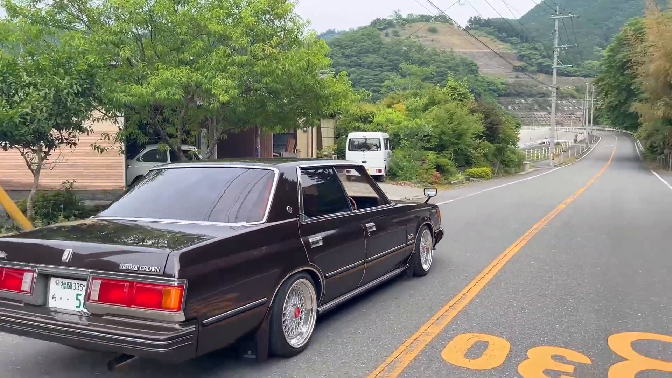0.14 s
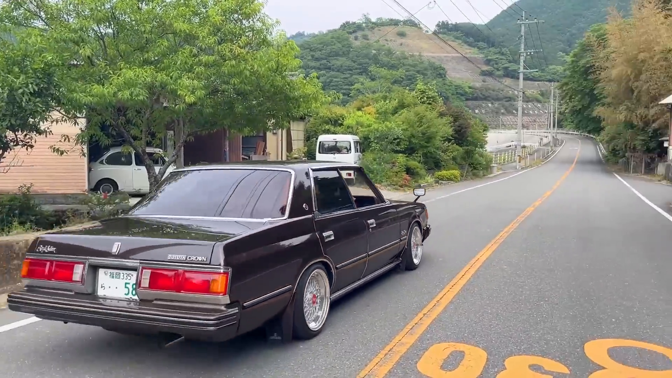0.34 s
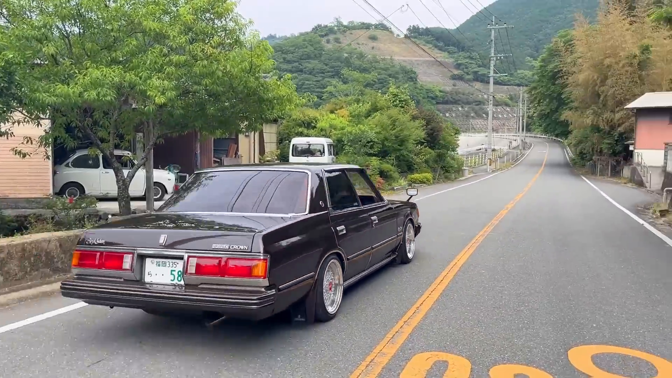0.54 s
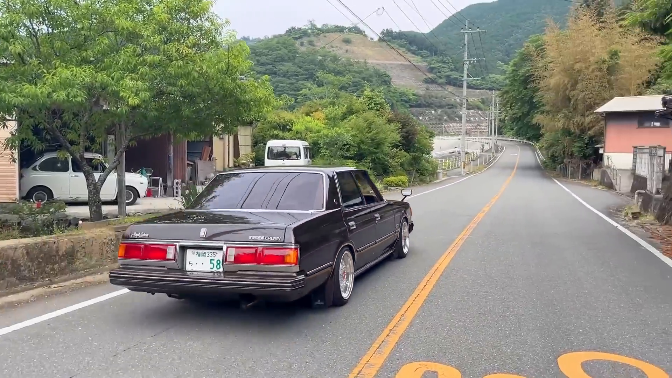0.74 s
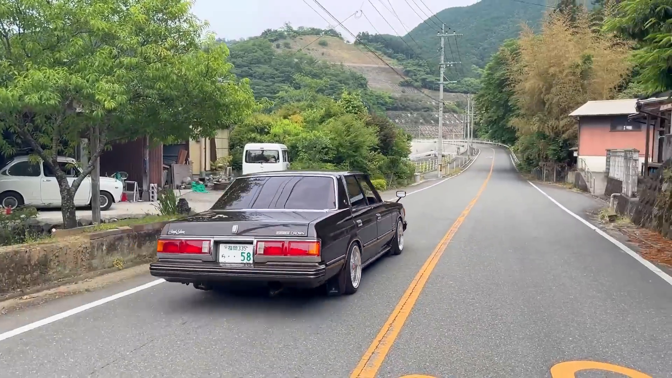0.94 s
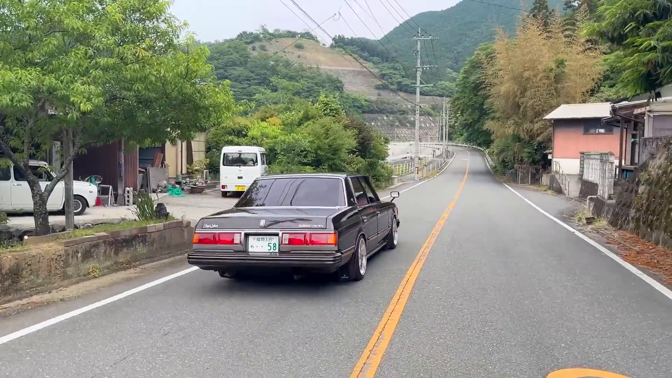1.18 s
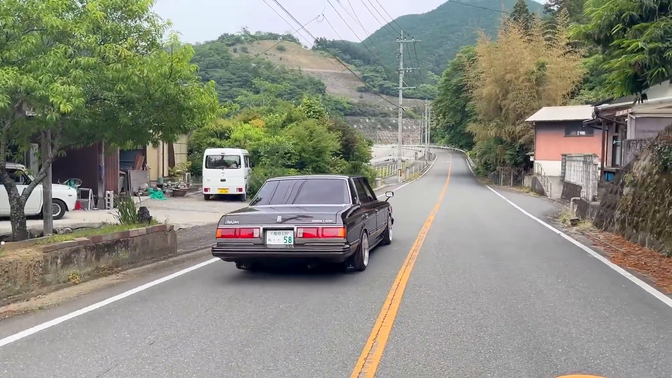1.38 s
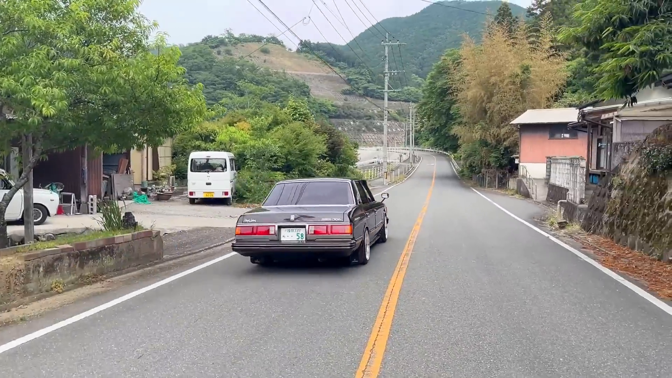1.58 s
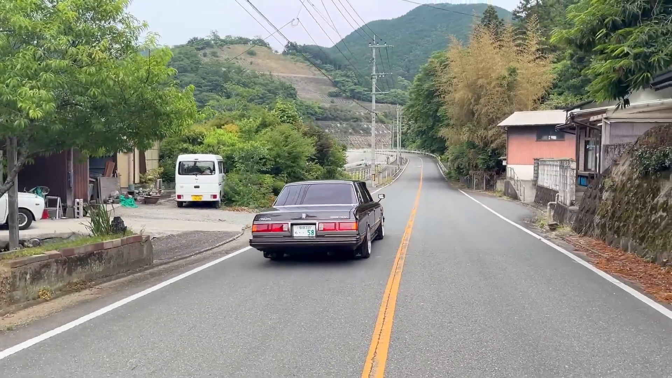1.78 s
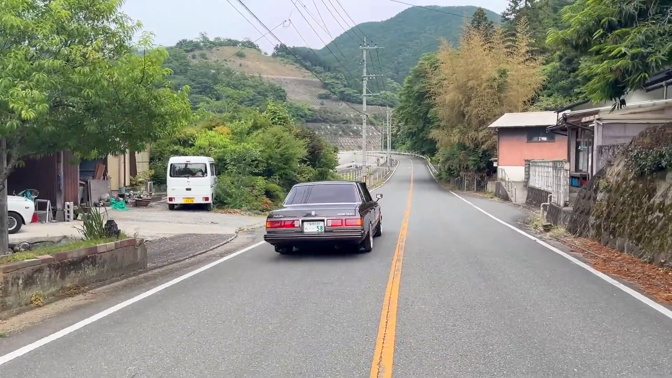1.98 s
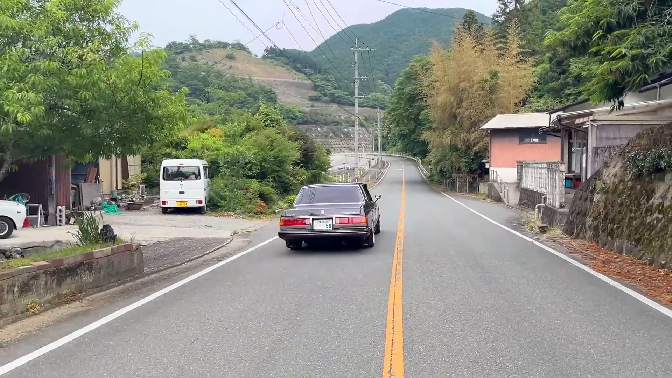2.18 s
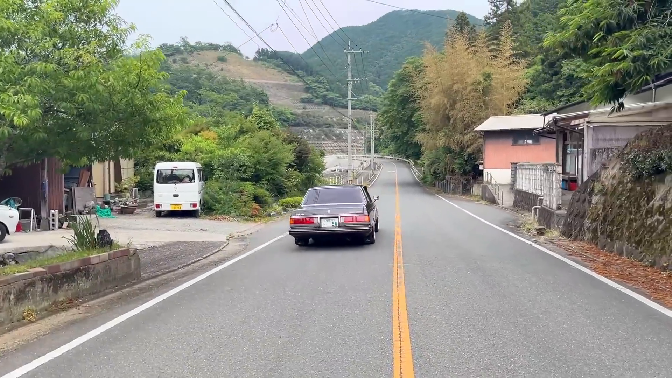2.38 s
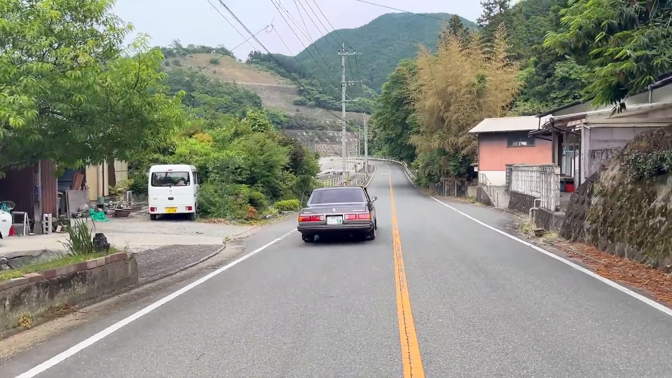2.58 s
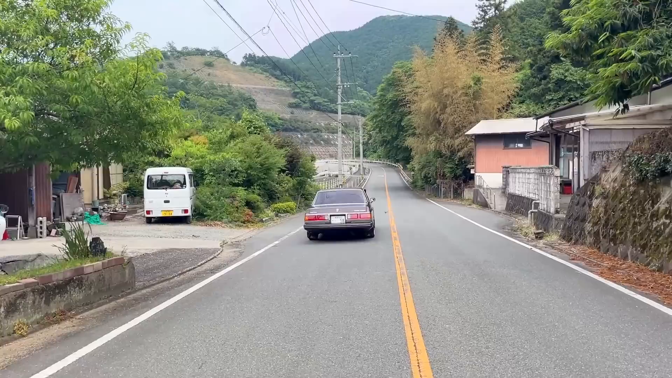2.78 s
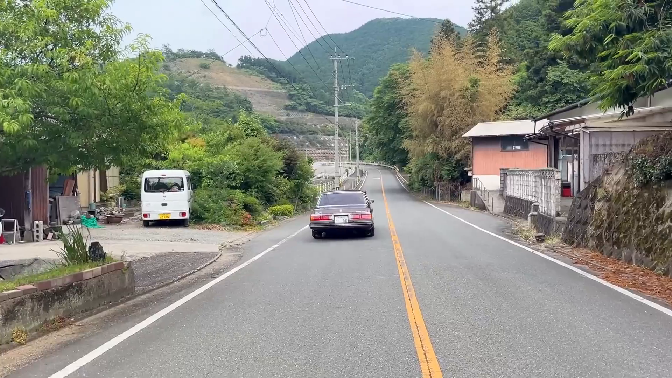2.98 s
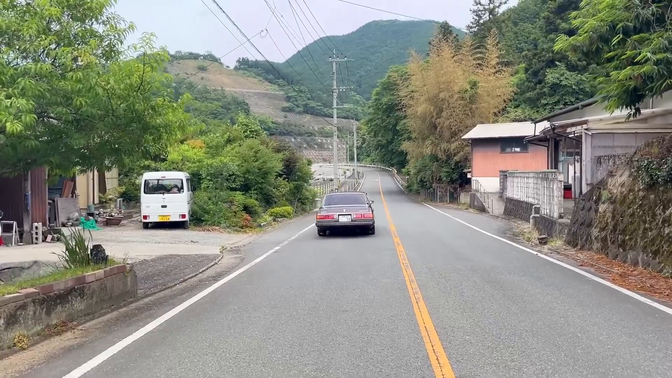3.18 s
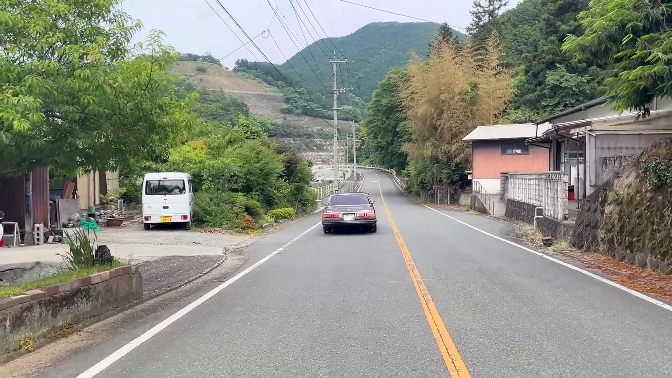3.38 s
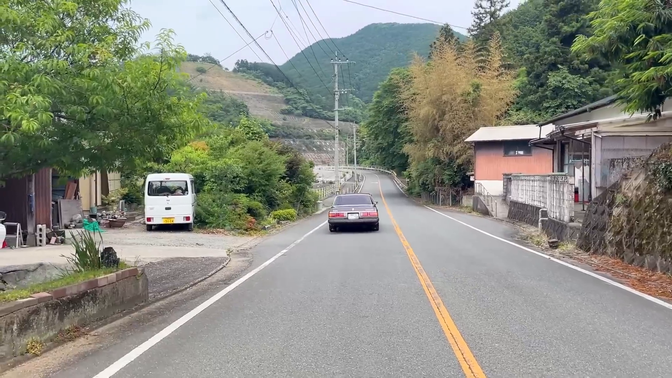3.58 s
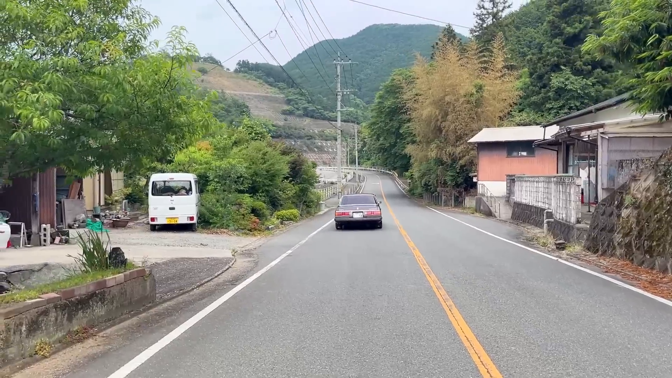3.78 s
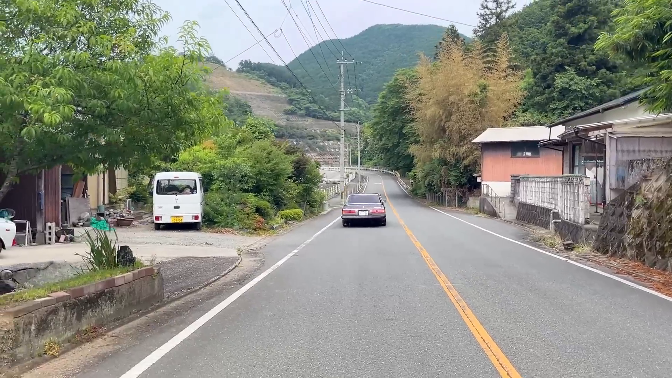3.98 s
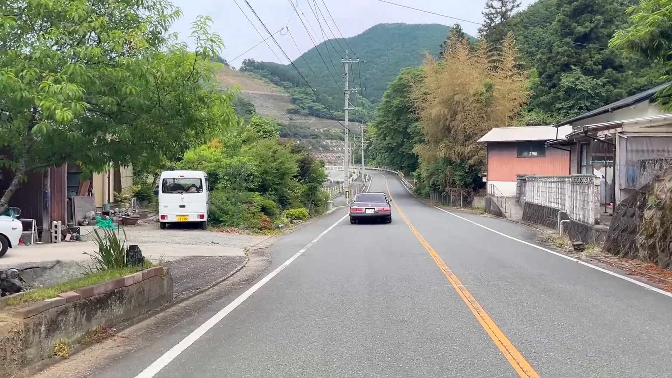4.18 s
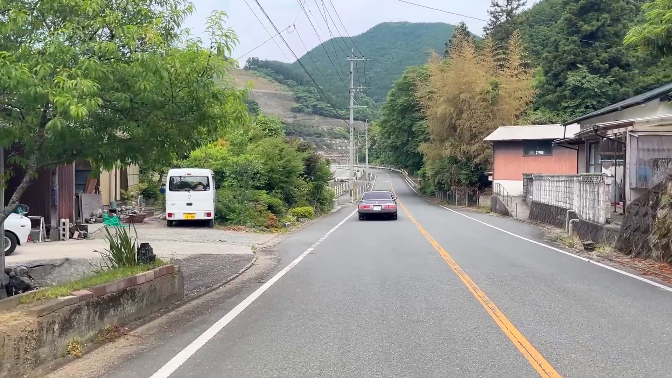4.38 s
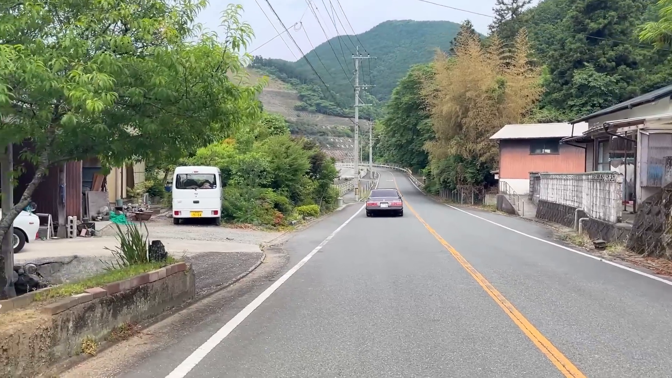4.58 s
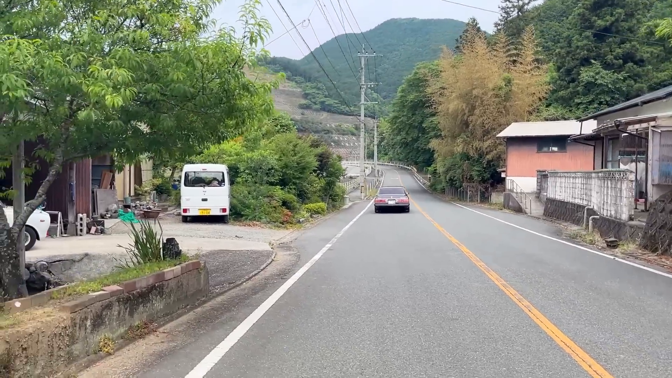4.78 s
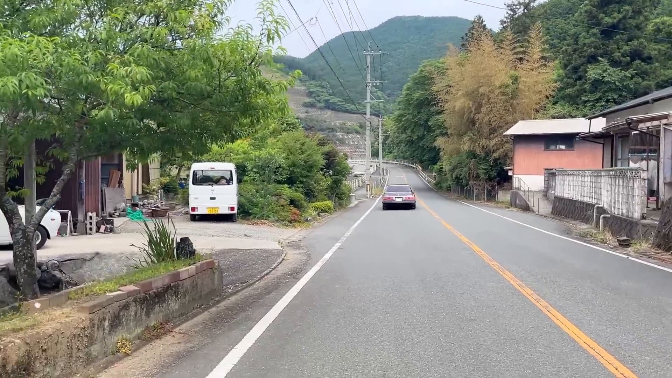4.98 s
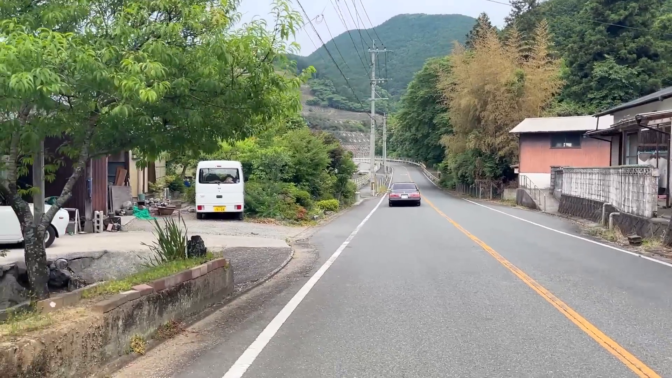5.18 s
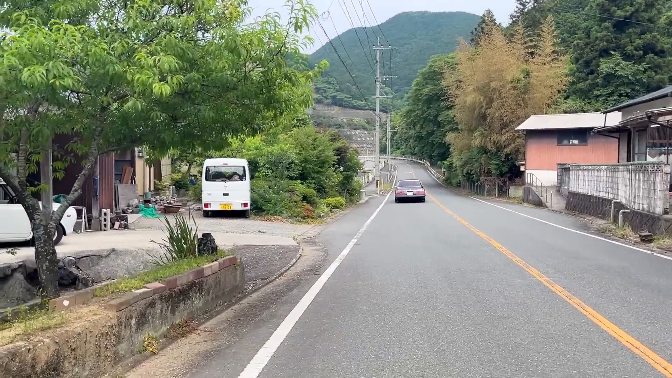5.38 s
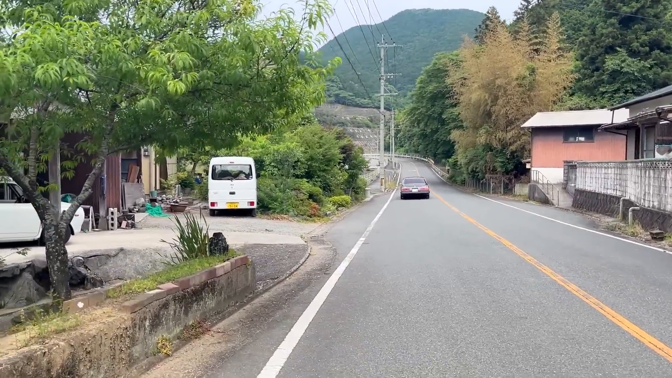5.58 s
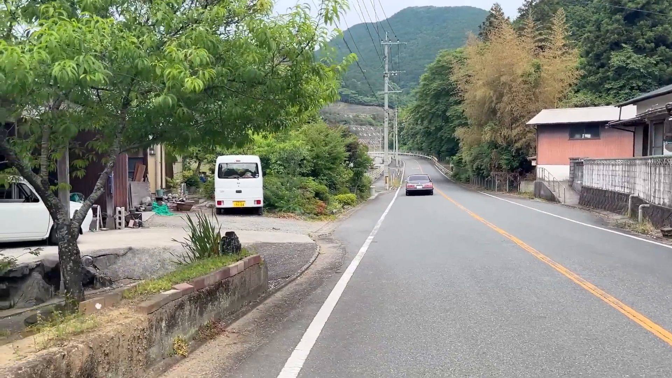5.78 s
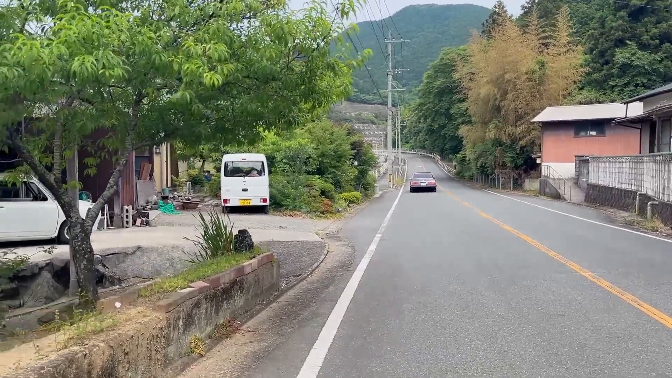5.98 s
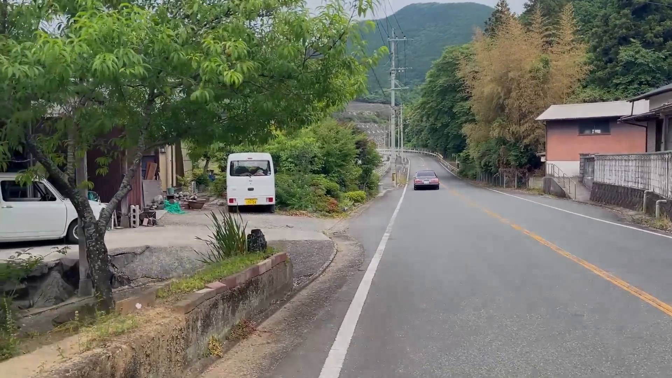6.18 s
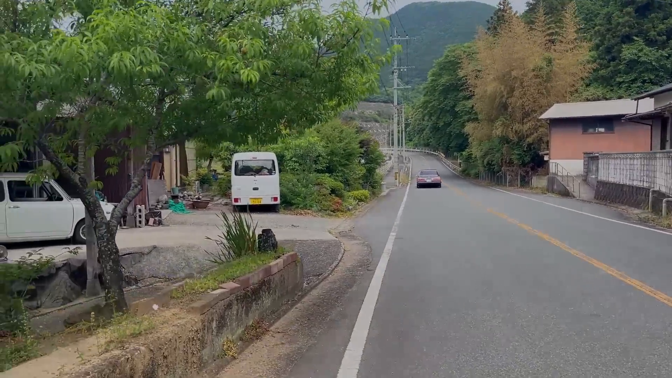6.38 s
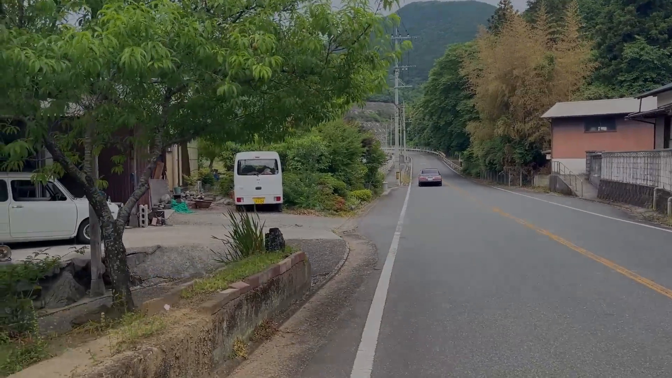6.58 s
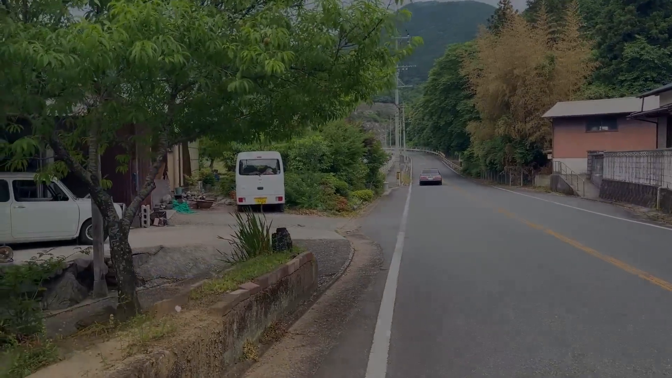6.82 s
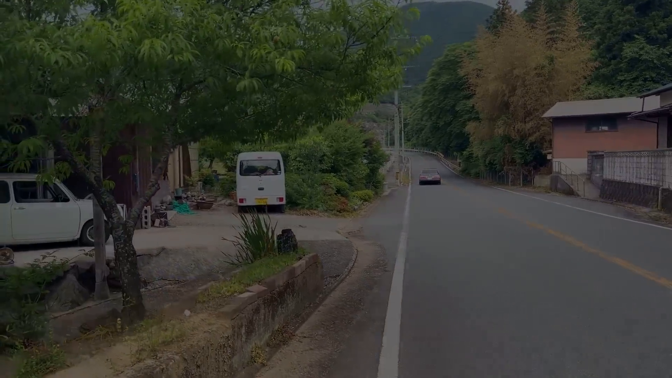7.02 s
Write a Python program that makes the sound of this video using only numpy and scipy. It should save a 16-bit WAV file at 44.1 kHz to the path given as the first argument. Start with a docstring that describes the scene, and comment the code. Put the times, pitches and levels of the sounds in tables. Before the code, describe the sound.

From 0 s an old six-cylinder sedan pulls away a few metres from a stereo microphone beside a village road. Its deep, buzzing exhaust is loudest at once and climbs in pitch, with fan whirr, tyre hiss and short wavering belt squeals in the first half second. Another squeal chirps around 1.75 s, just before the upshift at 1.9 s drops the pitch. Second gear rises more gradually while the car recedes, its boom fluttering and softening. Near 5.05 s it shifts again with a faint low thud; the pitch drops and eases, then around 5.95 s the engine falls to a weak coasting drone. Steady, muffled valley rush lies underneath and thins at the end. Small close grit clicks occur near 2.7, 3.4, 4.2 and 4.5 s, with grainy scuffs; the strongest click comes at 6.5 s. A thin airy whistle passes near 6.8 s as only distance remains by 7 s.

```python
"""Six-cylinder car pulling away

An old six-cylinder sedan pulls away along a village road, shifts up twice and fades into the distance.
Sine tones at crank orders and pulsed noise form the exhaust; noise through resonances forms the engine bay.
The slipping belt squeals in gliding sines until the first shift, and shaped noise gives the tyre hiss.
Close by, filtered pulses click as grit and grainy noise scuffs underfoot, over the steady rush of the valley."""
import sys
import numpy as np
from scipy import signal
from scipy.fft import rfft, irfft, next_fast_len
from scipy.io import wavfile

SR = 44100
rng = np.random.default_rng(int(sys.argv[2]) if len(sys.argv) > 2 else 0)


def master(y):
    """Save y as 16-bit WAV."""
    cut = np.clip(np.atleast_2d(y).T, -1, 1)
    pcm = np.round(cut * 32767)  # scale
    wavfile.write(sys.argv[1], SR, pcm.astype(np.int16))


N = 310905
TIME = np.arange(N) / SR   # [s]
START_M = 3.38   # distance of the car at the start
CYLINDER_PAIRS = 3   # six cylinders fire three times a crank turn

# first, second and third gear, coasting, back on the throttle:
# (start [s], firing rate [Hz], its rise [Hz/s], growth of that rise [Hz/s^2])
GEARS = [(0, 77, 7.5, 6), (1.885, 78.9, 2.92, 1.5), (5.04, 78.3, -1, 0), (5.95, 59.5, -1.5, 0),
         (6.97, 65, 2, 0)]


def exhaust_boom(turns, firing_hz, loads_db):
    """Periodic gas pulses radiate crank-order tones; silencer resonances colour those above the firing rate."""
    # level of the tone at the firing rate: (time [s], level [dB])
    boom_curve = [(0.03, -9), (0.54, -14), (1.9, -17.5), (2.13, -23.5), (2.18, -20), (3.17, -24.5),
                  (3.45, -34), (3.88, -27), (4.16, -36), (4.29, -28), (4.42, -34), (4.65, -28), (4.97, -40),
                  (5.05, -27.5), (5.14, -43), (5.22, -33), (5.35, -38), (5.51, -29.5), (5.74, -39.5),
                  (5.88, -37), (5.95, -54), (6.1, -57), (6.8, -64), (6.98, -50)]
    # strong tones above the firing rate: (order [cycles per crank turn], ...)
    upper_orders = (4.5, 6, 9)
    # peaks and notches of the silencer: (frequency [Hz], level at the starting distance before load [dB])
    silencer_curve = [(100, -32.5), (115, -24), (120, -22), (124, -18), (130, -20), (137, -25), (145, -22),
                      (154, -28), (160, -24), (163.3, -31), (165.5, -22.5), (171, -18), (178, -15),
                      (186, -14.5), (196, -26), (215, -25.5), (234, -31), (247, -23.5), (256, -27),
                      (263, -34.5), (275, -41), (290, -40)]
    # brief dips of the upper tones at each upshift: (time [s], length [s], depth [dB])
    duck_rows = [(1.854, 0.13, -4), (5.132, 0.061, -10)]
    # sideways scatter: (level against the direct tone at the start, before order scaling [dB],
    # share of the distance loss by which it gains [1])
    side_scatter = (-33, 0.43)
    fading_db, half_depth_m, fading_hz = 5, 45, 6   # moving air fades the tones more with distance
    roughness = 0.041

    duck_db = 0
    for s, length, depth_db in duck_rows:
        duck_db = duck_db + depth_db * np.exp(-2 * ((TIME - s) / length) ** 2)

    levels = {CYLINDER_PAIRS: in_time(boom_curve)[0]}
    for order, load_db in zip(upper_orders, loads_db):
        air_db = fading_db / (1 + half_depth_m / distance_m()) * drift(fading_hz)
        silencer_db = at_hz(silencer_curve, firing_hz * order / CYLINDER_PAIRS)
        levels[order] = receding(0) + load_db + duck_db + air_db + silencer_db

    start_db, share = side_scatter
    scattered = from_db(receding(start_db, -share)) * [[1], [-1]]
    tones = 0
    for order, level_db in levels.items():
        phase = 2 * np.pi * order * turns
        direct = (1 + roughness * drift(17)) * np.sin(phase)
        side = scattered * order / CYLINDER_PAIRS * drift(1.5) * np.cos(phase)
        tones = tones + from_db(level_db) * (direct + side)
    return np.sqrt(2) * tones   # levels are rms


def drive_line_thud():
    """Torque shock excites a low drive-line resonance as third gear bites."""
    # (time [s], length [s], frequency [Hz], bandwidth [Hz], level [dB])
    thud_rows = [(5.24, 0.05, 77, 30, -29)]
    return swells(thud_rows)


def exhaust_rasp(turns, firing_hz, load_db):
    """Unequal cylinders excite cycle harmonics in a resonant pipe; pulsating flow modulates its gas noise."""
    # weak tones: (harmonic number of the two-turn cycle, ...)
    overtone_numbers = (4, 5, 7, 8, 10, 11, 14, 15, 16, 21, 22, 24, 27, 30, 33, 36)
    # relative strength of each of those harmonics: (level [dB], ...)
    overtone_levels = [-2, -11.5, -12.5, -2.5, -8, -14, -10.5, -2, -7, -10.5, -14.5, -11, -15, -13.5, -15,
                       -15]
    # peaks and notches of the pipe: (frequency [Hz], gain [dB])
    pipe_curve = [(85, 0), (100, -10), (112, -5), (124, 1), (134, 2), (145, 0), (200, 0), (211, -4),
                  (226, 0), (260, 0), (280, -2), (297, 2), (311, -1), (325, 2), (350, -3), (375, -3),
                  (403, 3), (425, -1), (450, -2), (482, 5.5), (515, 2), (545, -2), (600, -3), (700, -8)]
    # tones: (level at the starting distance before load and weights [dB], share of 1/distance loss [1])
    rasp_recession = (-33, 0.6)
    # gas noise: (level at the starting distance before load [dB], share of 1/distance loss [1])
    puff_recession = (-37, 0.44)
    # spectrum of the gas noise: (frequency [Hz], relative density [dB per Hz])
    puff_colour = [(35, -7.5), (55, 1.5), (80, 6.5), (130, -1), (220, 0.5), (350, -3.5), (480, -2.5),
                   (680, -16.5), (1000, -29), (2000, -38.5)]
    waver = 0.31   # relative amplitude wander of each tone

    cycle_hz = firing_hz / (2 * CYLINDER_PAIRS)
    tones = 0
    for k, level_db in zip(overtone_numbers, overtone_levels):
        gain = from_db(level_db + at_hz(pipe_curve, k * cycle_hz))
        start_phase = 2 * np.pi * rng.random()
        tones = tones + gain * (1 + waver * drift(3.44)) * np.cos(np.pi * k * turns + start_phase)

    gas = coloured_noise(puff_colour, patchy_db=2.0, count=3)
    gas = gas * throb(turns, depth=0.17, bank_depth=0.25)
    rasp = from_db(receding(*rasp_recession)) * tones
    puffs = from_db(receding(*puff_recession)) * gas
    return from_db(load_db) * (rasp + puffs)


def engine_bay(turns, firing_hz, load_db):
    """Broadband fan and valve-gear noise excites narrow modes and is modulated in step with the engine."""
    # whole bay: (level at the starting distance before load, speed and part gains [dB],
    # share of 1/distance loss [1])
    bay_recession = (-50, 0.84)
    # spectrum of the whirr: (frequency [Hz], relative density [dB per Hz])
    whirr_colour = [(500, 1), (750, 11), (1100, 5), (1450, 3), (1800, 0), (2300, 2.5), (3000, -1.5),
                    (3800, 0), (5000, -9.5), (6300, -4), (8000, -26), (10000, -26)]
    # ringing parts: (frequency [Hz], bandwidth [Hz], relative level [dB])
    mode_rows = [(1000, 200, -13), (1329, 49, -1.5), (1552, 74, -3.5), (1890, 30, -7), (2073, 41, -7.5),
                 (2425, 15, -8.5), (2640, 28, -4.5), (3077, 38, -13.5), (3650, 390, -9.5),
                 (4030, 63, -15.5), (4160, 77, -21.5), (6540, 230, -19)]
    speed_power, reference_hz = 2.9, 82.3   # amplitude grows with this power of the firing rate
    whirr_db, modes_db = 7.5, 2.5   # gains of the two parts
    modes_fade_db_per_s, modes_flicker_db = 0.4, 2.0

    whirr = from_db(whirr_db) * coloured_noise(whirr_colour, patchy_db=1.5, count=4)
    modes = 0
    for hz, width_hz, level_db in mode_rows:
        flicker = from_db(level_db + modes_flicker_db * drift(4.6))
        modes = modes + flicker * resonant_noise(hz, width_hz)
    modes = from_db(modes_db - modes_fade_db_per_s * TIME) * modes

    running = (whirr + modes) * throb(turns, depth=0.05, bank_depth=0.06)
    speed_gain = (firing_hz / reference_hz) ** speed_power
    return from_db(receding(*bay_recession) + load_db) * speed_gain * running


def intake_and_gearbox_whines():
    """Narrow-band resonance turns noise into brief howls and whines of intake and gearbox."""
    # (time [s], length [s], frequency [Hz], bandwidth [Hz], level [dB])
    whine_rows = [(.2, 0.59, 575, 89, -42), (0.6, 0.13, 1352, 50, -51), (1.05, .15, 1290, 69.3, -44.5),
                  (1.48, .22, 1298, 83.5, -42.5), (1.72, 0.32, 6380, 547, -64), (2.12, 0.2, 324, 60, -44.5),
                  (2.3, 0.6, 1340, 70, -59.5), (3.55, 0.3, 2120, 400, -59.5),
                  (3.22, 0.28, 5670, 450, -65.5), (3.42, 0.073, 5000, 800, -62.5)]
    return swells(whine_rows)


def belt_squeals():
    """Friction of the slipping belt gives short gliding tones, modulated in frequency and amplitude."""
    # (time [s], length [s], frequency [Hz], glide [Hz/s], level [dB])
    squeal_rows = [(0.018, 0.073, 2640, 200, -40.5), (0.205, 0.083, 2640, -1.5, -44),
                   (0.3, 0.05, 2630, -300, -53), (0.417, 0.089, 2615, 600, -45),
                   (0.505, 0.049, 1888, 802, -43.5), (1.754, 0.038, 2616, -500, -45),
                   (1.867, 0.028, 2690, 2, -51)]
    waver_hz, flutter_db = 22, 2.2   # spread of pitch and level
    waver = np.cumsum(waver_hz * drift(45)) / SR   # in cycles
    out = np.zeros(N)
    for s, length, hz, glide, level_db in squeal_rows:
        near = abs(TIME - s) < 2 * length
        t = TIME[near] - s
        bell = np.exp(-2 * (t / length) ** 2)
        cycles = hz * t + .5 * glide * t ** 2 + waver[near]
        out[near] += from_db(level_db) * bell * np.sin(2 * np.pi * cycles)
    return np.sqrt(2) * from_db(flutter_db * drift(45)) * out


def tyre_and_gas_hiss(load_db):
    """Turbulence and tyre contact radiate high-frequency noise that weakens with distance."""
    # (level at the starting distance before load [dB], share of 1/distance loss [1])
    hiss_recession = (-54, 0.94)
    # (frequency [Hz], relative density [dB per Hz])
    hiss_colour = [(3000, -11.5), (5000, -5), (7000, -5), (9300, 3.5), (11000, -0.5), (13000, 6.5),
                   (15000, -1)]
    return from_db(receding(*hiss_recession) + load_db) * coloured_noise(hiss_colour, patchy_db=2.0)


def throb(turns, depth, bank_depth):
    """Pulsating flow peaks at each firing; unequal manifold halves add a half-rate component."""
    firing_phase = 2 * np.pi * CYLINDER_PAIRS * turns
    return rms_one(np.exp(depth * np.cos(firing_phase) + bank_depth * np.cos(firing_phase / 2)))


def firing_rate():
    """Gear kinematics fix the firing rate, which climbs in first and second and sags below at the launch."""
    launch_sag_hz, launch_s, slip_s = 8, .175, .26
    climbs = []
    for s, hz, rise, growth in GEARS:
        t = TIME - s
        climbs.append(hz + rise * t + .5 * growth * t ** 2)
    return through_gears(climbs, slip_s) - launch_sag_hz * np.exp(-(TIME / launch_s) ** 2)


def gear_loads():
    """Engine load sets source strength: levels hold through a gear and slide on just after each change."""
    # one row per row of GEARS: (gain of crank order 4.5 [dB], of order 6 [dB], of order 9 [dB],
    # of rasp and puffs [dB], of the whirr and modes [dB], of the hiss [dB])
    load_rows = [(-2.5, 0.5, -1, 4, 1.7, 1), (4, 3.5, 5.5, 2.5, 1.3, 1), (7, 9.5, 14.5, -0.5, 4.9, 2),
                 (-19, -4.5, -23.5, -19, 10.2, -5), (-21, -1, -23, -19, 1.6, -6)]
    return [through_gears(column, takes_s=0.17, lag_s=0.014) for column in zip(*load_rows)]


def through_gears(values, takes_s, lag_s=0):
    """Smooth interpolation carries one value per gear to the next at every change."""
    out = values[0]
    for (from_s, *_), value in zip(GEARS[1:], values[1:]):
        out = out + (value - out) * step(from_s + lag_s, takes_s)
    return out


def step(at_s, takes_s):
    """A hyperbolic tangent rises smoothly from 0 to 1."""
    return .5 + .5 * np.tanh(2 * (TIME - at_s) / takes_s)


def distance_m():
    """Uniform acceleration sets the car's distance from the listener."""
    start_m_per_s, acceleration_m_per_s2 = 2.65, 3.5
    return START_M + start_m_per_s * TIME + .5 * acceleration_m_per_s2 * TIME ** 2


def receding(level_db, share=1):
    """Spherical spreading lowers the level by a share of the 1/distance loss."""
    return level_db - share * 20 * np.log10(distance_m() / START_M)


def grit():
    """Impulsive fracture gives each grain a short band-limited pulse; roadside scattering adds a faint tail."""
    # (time [s], peak level before panning [dB], lowest frequency [Hz], highest frequency [Hz],
    # bright crack against the dull pulse [dB])
    click_rows = [(2.7383, -23, 635, 1510, -30), (3.3695, -23.5, 850, 1590, -26),
                  (4.205, -21, 900, 1580, -27), (4.513, -33, 550, 1050, -30), (6.481, -14, 377, 1710, -21),
                  (6.4962, -43, 250, 1920, -32), (6.5244, -35, 500, 1270, -30),
                  (6.622, -37, 700, 1480, -34)]
    tail_db, tail_t60_s = -23, 0.12
    tick_db, left_db = -17, -5.0   # top of the crack; left against right

    out, t = np.zeros((2, N)), TIME[:SR // 3]
    snap = (t == 0) + 1e-18   # the tiny offset keeps the filters out of denormals
    crack = band(snap, 2200, 3200, order=4) + from_db(tick_db) * band(snap, 5500, 7500)
    crack = crack / abs(crack).max()
    for s, level_db, low_hz, high_hz, crack_db in click_rows:
        dull = signal.sosfilt(signal.cheby1(6, 1, high_hz, fs=SR, output="sos"), snap)
        body = signal.sosfilt(signal.butter(3, low_hz, "high", fs=SR, output="sos"), dull)
        pulse = body / abs(body).max() + from_db(crack_db) * crack
        ringing = resonant_noise(np.sqrt(low_hz * high_hz), 1000, size=len(t), order=3)
        tail = from_db(tail_db - 60 * t / tail_t60_s) * ringing
        start = round(s * SR)
        out[:, start:start + len(t)] += from_db(level_db) * (pulse + tail)
    return out * panned(left_db)


def scuffs():
    """Friction of soles and clothes gives band noise whose rapid level modulation sounds grainy."""
    # (time [s], length [s], frequency [Hz], bandwidth [Hz], level [dB])
    scuff_rows = [(2.605, 0.041, 5970, 7055, -60), (4.193, 0.016, 4540, 1400, -56),
                  (4.195, 0.023, 1440, 895, -42.5), (4.305, 0.02, 1410, 750, -43.5),
                  (4.34, 0.05, 1490, 900, -50.5), (4.507, 0.023, 860, 450, -40),
                  (4.515, 0.049, 4500, 3460, -73), (6.545, 0.036, 1000, 870, -53.5),
                  (5.58, 0.22, 4970, 2200, -69), (5.66, 0.012, 4580, 2500, -61)]
    grain_db, grain_hz = 2.5, 160
    return from_db(grain_db * drift(grain_hz)) * swells(scuff_rows)


def roadside(x):
    """Delayed reflections from walls and the bank return band-limited, from either side in turn."""
    # (delay [s], level [dB])
    echo_rows = [(.013, -21), (.029, -25), (.047, -23), (.071, -21.5)]
    out, dull = x.copy(), band(x, 300, 3500, order=1)
    for k, (delay, level_db) in enumerate(echo_rows):
        out[k % 2] += from_db(level_db) * np.interp(TIME - delay, TIME, dull[k % 2], 0)
    return out


def far_drone():
    """Narrow-band noise swells into the faint drone of the car far down the road."""
    # (time [s], length [s], frequency [Hz], bandwidth [Hz], level [dB])
    drone_rows = [(6.3, 0.75, 270, 53, -47.5), (5.75, 0.94, 1110, 98, -56.5), (5.9, 0.6, 2200, 140, -62.5),
                  (5.85, 0.95, 2850, 400, -67)]
    return swells(drone_rows)


def airy_whistle():
    """Resonant noise makes a thin, airy whistle from up the road."""
    # (time [s], length [s], frequency [Hz], bandwidth [Hz], level [dB])
    whistle_rows = [(6.705, 0.045, 2080, 130, -61), (6.795, 0.066, 2060, 170, -55.5)]
    return swells(whistle_rows)


def valley_rush():
    """Many distant incoherent sources sum to the broadband rush of road and valley."""
    # (time [s], level before a lift of 3.5 dB [dB])
    rush_curve = [(0, -47.5), (2, -44.5), (3.5, -47.5), (4.4, -45.5), (5.2, -45), (6, -46.5), (6.55, -49.5),
                  (6.8, -50.5), (7.05, -54)]
    # (frequency [Hz], relative density [dB per Hz])
    rush_colour = [(40, -12.5), (70, 1), (130, 5), (200, 7), (290, 7), (450, 2), (560, 1), (720, -3),
                   (900, -1.5), (1100, -5), (1400, -2.5), (1700, -16.5), (2100, -13), (2600, -20),
                   (3200, -23.5), (6000, -42.5)]
    noise = coloured_noise(rush_colour, patchy_db=1.8, count=4)
    return from_db(in_time(rush_curve)[0] + 3.5) * noise


def coloured_noise(colour, patchy_db, count=2):
    """Filter-bank synthesis: stereo noise in count bands an octave, each flickering a little; rms 1."""
    out, white = 0, rng.standard_normal((2, 2, N))
    lowest_hz, highest_hz = colour[0][0], colour[-1][0]
    edges = np.geomspace(lowest_hz, highest_hz, int(count * np.log2(highest_hz / lowest_hz)) + 2)
    for k, (low, high) in enumerate(zip(edges, edges[1:])):
        hz = np.sqrt(low * high)
        gain = from_db(at_hz(colour, hz) + patchy_db * drift(16.2))
        # neighbouring bands draw on unrelated noises
        out = out + gain * spread(band(white[k % 2], low, high), hz)
    return rms_one(out)


def resonant_noise(hz, width_hz, size=N, order=1):
    """Resonance selects a narrow band of stereo noise; rms 1."""
    low = np.hypot(hz, width_hz / 2) - width_hz / 2   # the geometric mean of the edges is hz
    noise = band(rng.standard_normal((2, size)), low, low + width_hz, order=order)
    return rms_one(spread(noise, hz))


def swells(rows):
    """Gaussian envelopes shape short swells of resonant noise."""
    out = np.zeros((2, N))
    for s, length, hz, width_hz, level_db in rows:
        near = np.flatnonzero(abs(TIME - s) < 2 * length)
        bell = np.exp(-2 * ((TIME[near] - s) / length) ** 2)
        out[:, near] += from_db(level_db) * bell * resonant_noise(hz, width_hz, size=len(near), order=2)
    return out


def spread(pair, hz):
    """Unrelated mid and side noises make a diffuse stereo field."""
    # (frequency [Hz], side against mid [dB])
    side_curve = [(30, -7), (80, -9), (250, -13), (450, -13), (700, -10), (1000, -8), (1300, -5),
                  (2200, -7), (3100, -6), (4000, -7), (5300, -6), (10000, -8)]
    return pair[0] + from_db(at_hz(side_curve, hz)) * pair[1] * [[1], [-1]]


def drift(rate_hz):
    """Low-pass filtered noise is a slow random wander of spread 1."""
    r = np.exp(-200 * np.pi * rate_hz / SR)   # double pole, run at one value per 100 samples
    white = rng.standard_normal(N // 100 + 1002)
    slow = signal.lfilter([1], [1, -2 * r, r * r], white)[1000:]   # drops the filter's start
    return np.interp(np.arange(N) / 100, np.arange(len(slow)), rms_one(slow))


def band(x, low, high, order=2):
    """A Butterworth band-pass has a maximally flat passband."""
    edges = [max(low, 10), min(high, .45 * SR)]
    return signal.sosfilt(signal.butter(order, edges, "band", fs=SR, output="sos"), x)


def panned(left_db):
    """Interchannel level difference: half is added on the left and half taken from the right."""
    return from_db(np.array([[.5], [-.5]]) * left_db)


def at_hz(points, hz):
    """Linear interpolation reads a spectrum on a log-frequency axis."""
    points = np.array(points)
    return np.interp(np.log(hz), np.log(points[:, 0]), points[:, 1])


def in_time(rows):
    """Linear interpolation reads each column of a curve at every sample."""
    s, *columns = np.transpose(rows)
    return [np.interp(TIME, s, c) for c in columns]


def from_db(db):
    """Amplitude gain is ten to the power of decibels over twenty."""
    return 10 ** (np.asarray(db) / 20)


def rms_one(x):
    """Division by the root mean square gives unit power."""
    return x / np.sqrt(np.mean(x ** 2) + 1e-20)


def scene():
    """Superposition adds the car, the small sounds nearby and the valley."""
    firing_hz = firing_rate()
    turns = np.cumsum(firing_hz) / SR / CYLINDER_PAIRS   # of the crank
    *tones_db, puffs_db, whirr_db, hiss_db = gear_loads()

    exhaust = exhaust_boom(turns, firing_hz, tones_db) + drive_line_thud()
    exhaust = exhaust + exhaust_rasp(turns, firing_hz, puffs_db)
    bay = engine_bay(turns, firing_hz, whirr_db) + intake_and_gearbox_whines() + belt_squeals()
    echoing = roadside(bay + grit() + scuffs())
    hiss = tyre_and_gas_hiss(hiss_db)
    far = far_drone() + airy_whistle()
    return exhaust + echoing + hiss + far + valley_rush()


def record(dry):
    """Left and right differ in phase and level by frequency; an elliptic low-pass cuts the top steeply."""
    # (frequency [Hz], phase lead of the left [rad])
    phase_curve = [(300, 0), (500, -.1), (700, 1.0), (1000, 1.1), (1350, 1.4), (1580, 2.7), (1750, .2),
                   (2200, .4), (3000, 1.5), (3700, .2), (4900, .7), (6000, -1.1), (8300, -3.1),
                   (14500, -8.8)]
    # (frequency [Hz], left against right [dB])
    balance_curve = [(60, .5), (220, 0), (420, .5), (600, -4.5), (800, 0), (1000, 4), (1280, 4),
                     (1520, -2.5), (1720, 4), (2200, .5), (3000, 4), (4900, 6.5), (7000, 2), (8000, 0)]
    cutoff_hz = 14500

    size = next_fast_len(N + SR // 10)
    hz = np.maximum(np.arange(size // 2 + 1) * SR / size, 1)
    phase = np.array([[.5], [-.5]]) * at_hz(phase_curve, hz)
    channels = panned(at_hz(balance_curve, hz)) * np.exp(1j * phase)
    heard = irfft(rfft(dry, size) * channels, size)[:, :N]
    return signal.sosfilt(signal.ellip(10, .1, 80, cutoff_hz, fs=SR, output="sos"), heard)


dry = scene()
out = record(dry)
master(out)
```